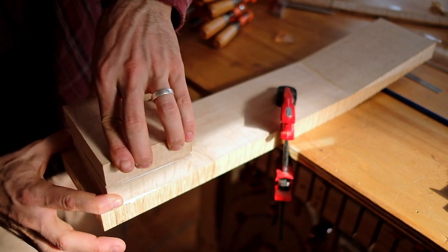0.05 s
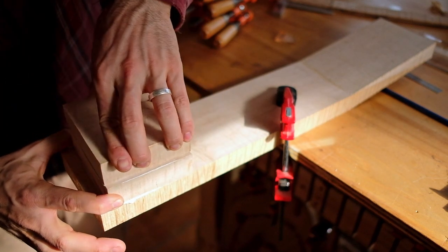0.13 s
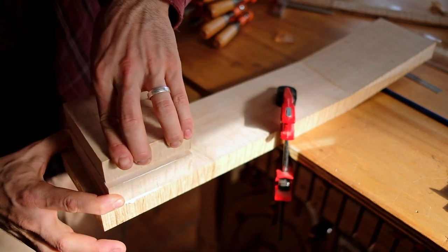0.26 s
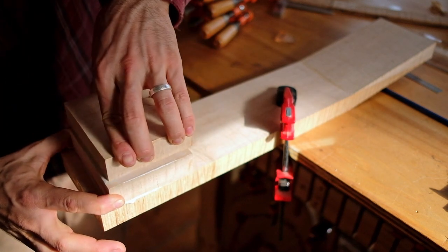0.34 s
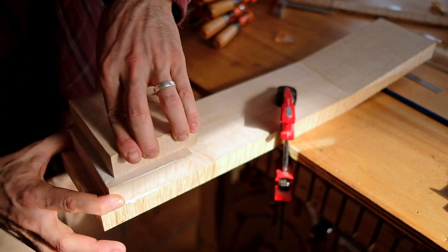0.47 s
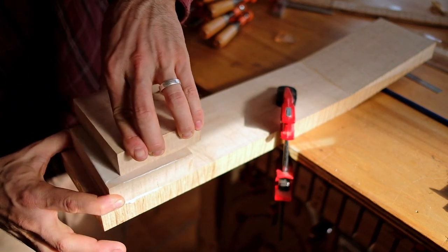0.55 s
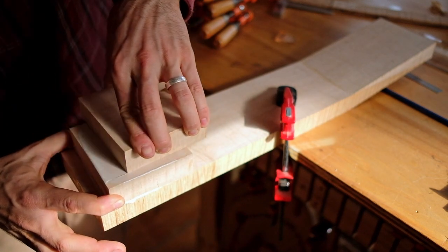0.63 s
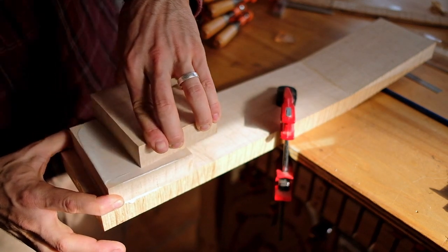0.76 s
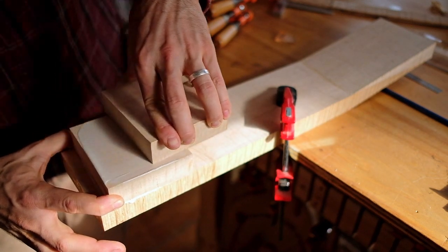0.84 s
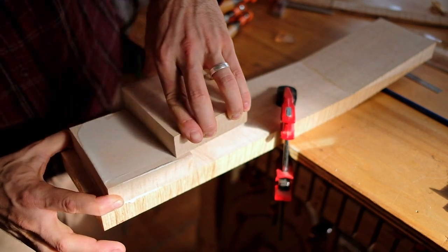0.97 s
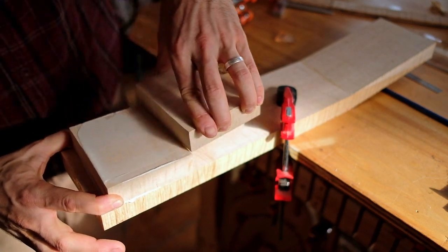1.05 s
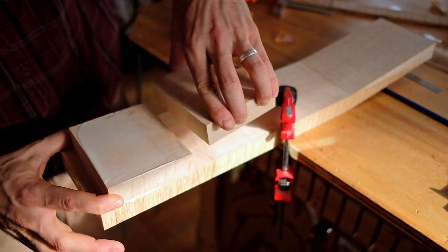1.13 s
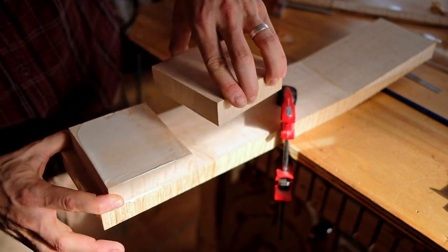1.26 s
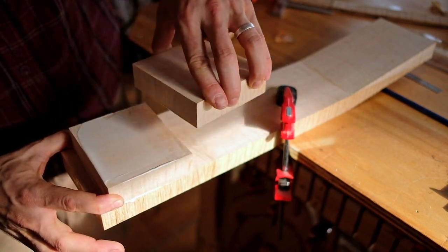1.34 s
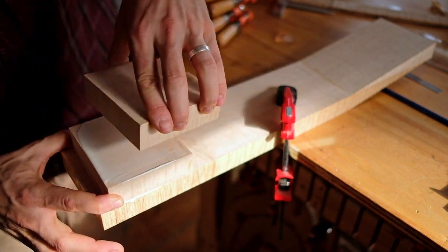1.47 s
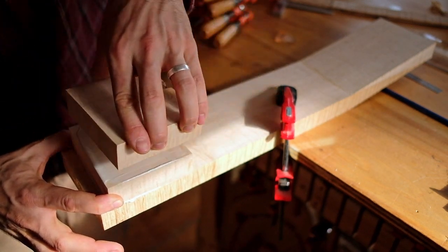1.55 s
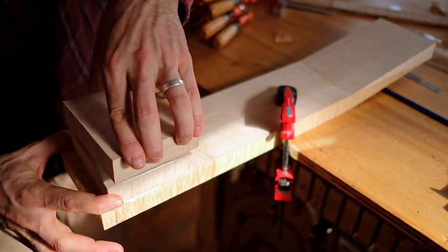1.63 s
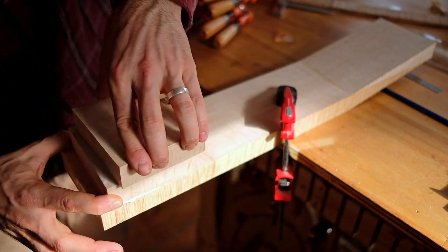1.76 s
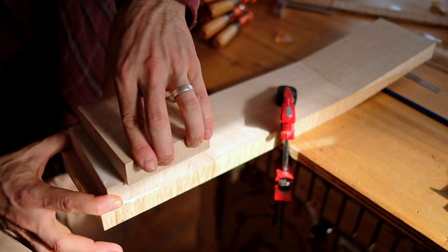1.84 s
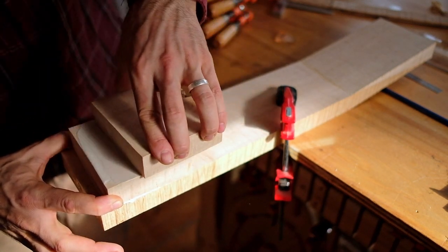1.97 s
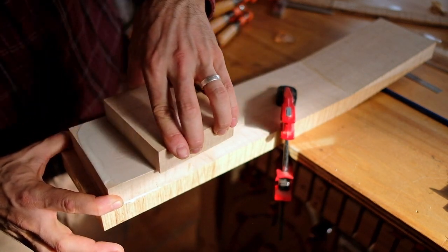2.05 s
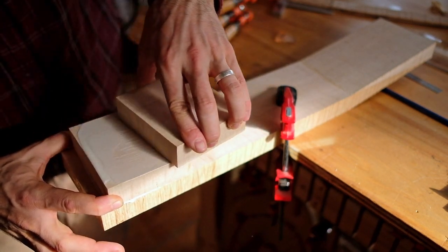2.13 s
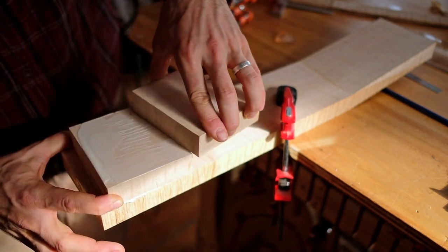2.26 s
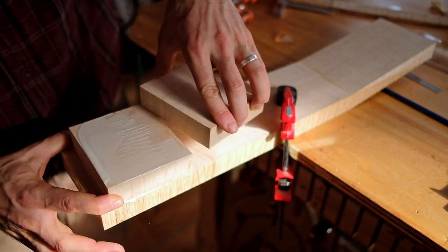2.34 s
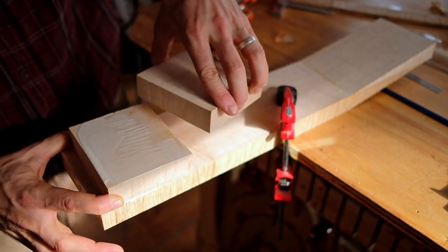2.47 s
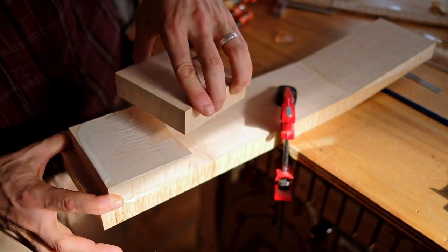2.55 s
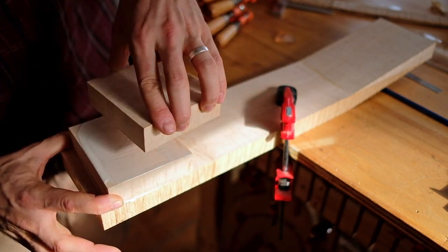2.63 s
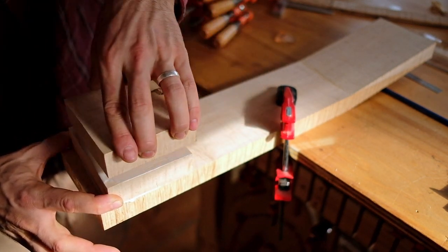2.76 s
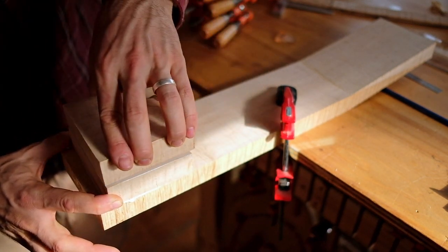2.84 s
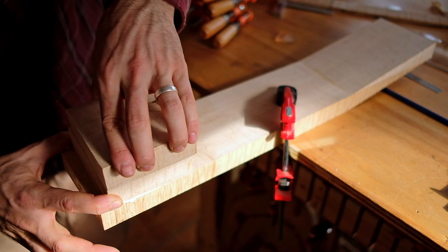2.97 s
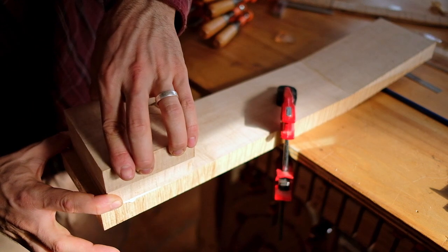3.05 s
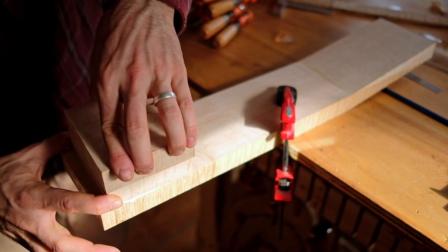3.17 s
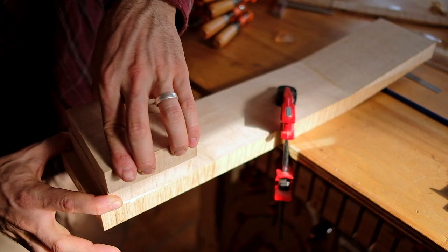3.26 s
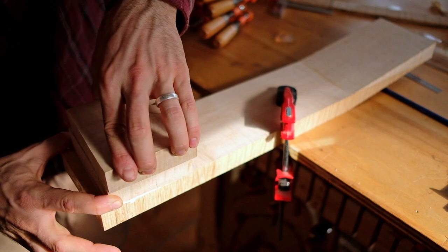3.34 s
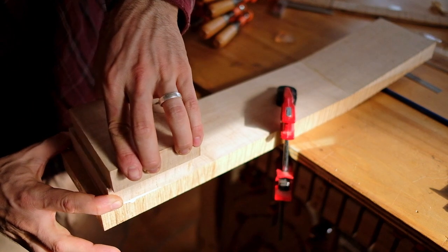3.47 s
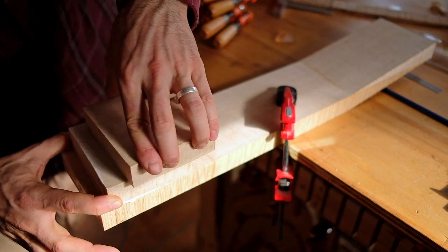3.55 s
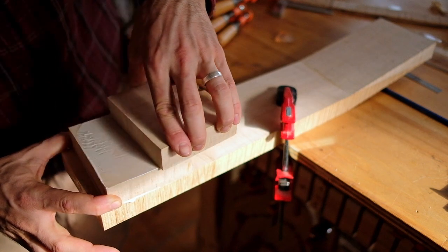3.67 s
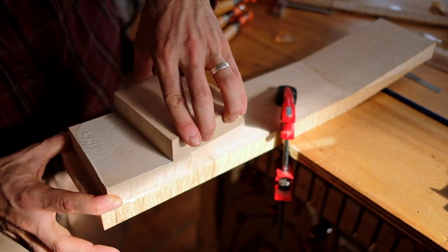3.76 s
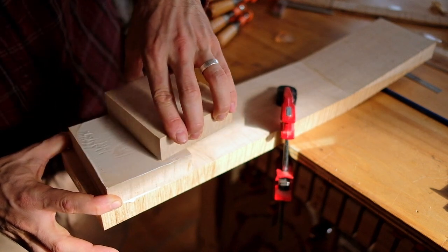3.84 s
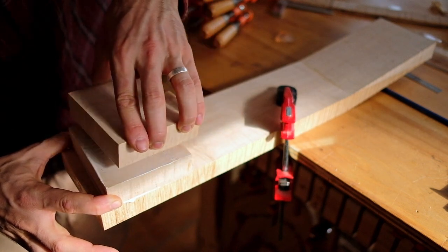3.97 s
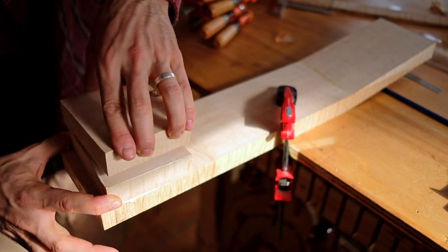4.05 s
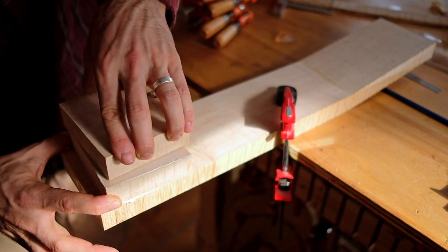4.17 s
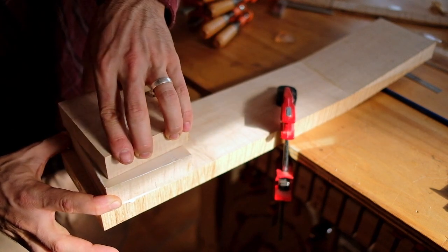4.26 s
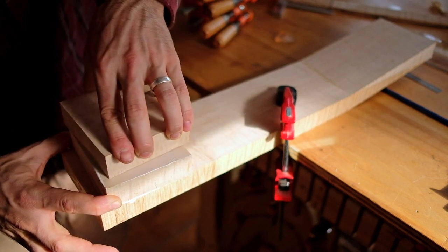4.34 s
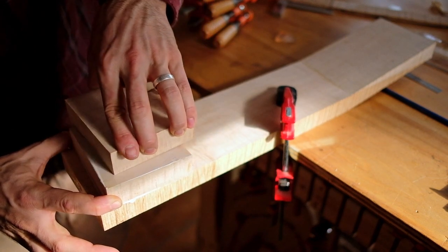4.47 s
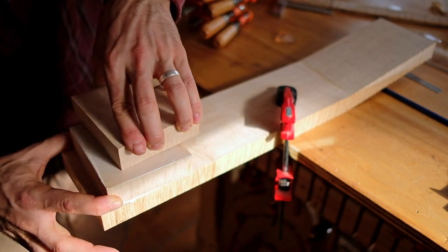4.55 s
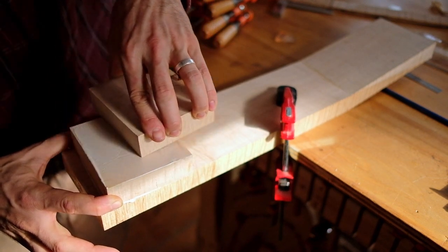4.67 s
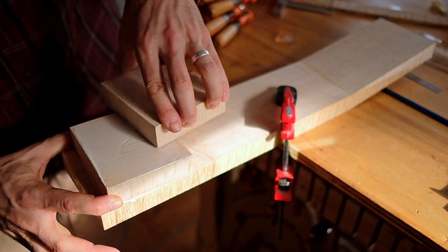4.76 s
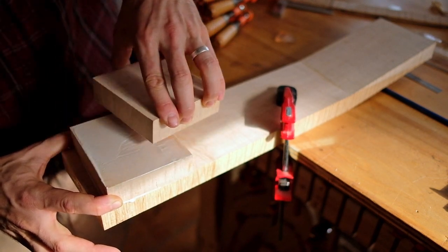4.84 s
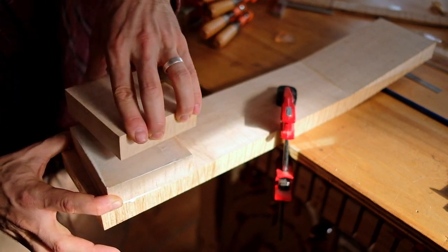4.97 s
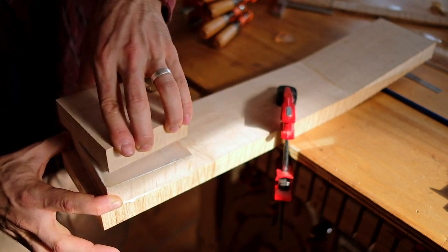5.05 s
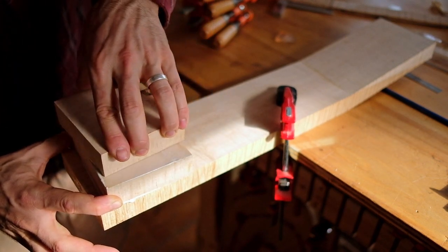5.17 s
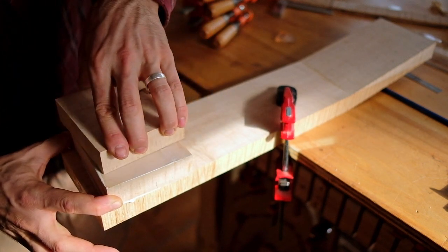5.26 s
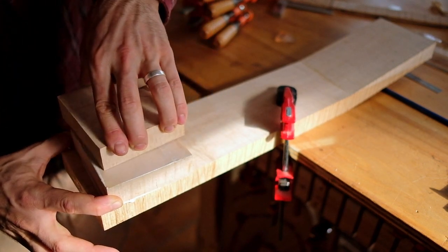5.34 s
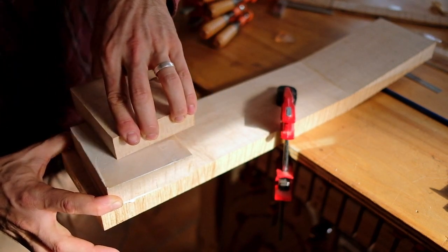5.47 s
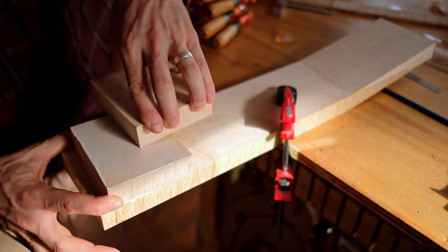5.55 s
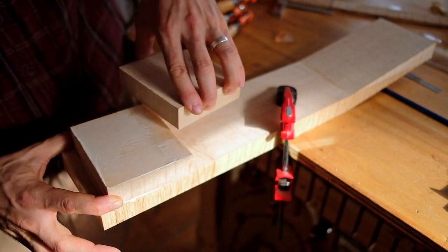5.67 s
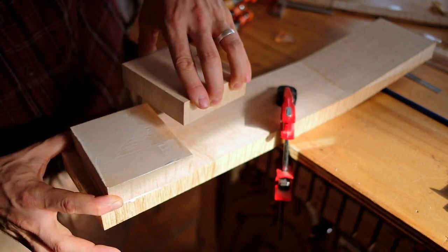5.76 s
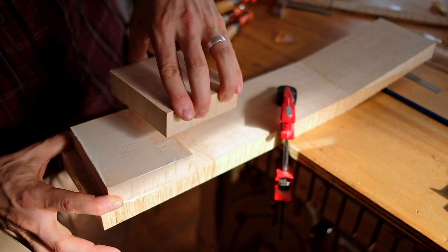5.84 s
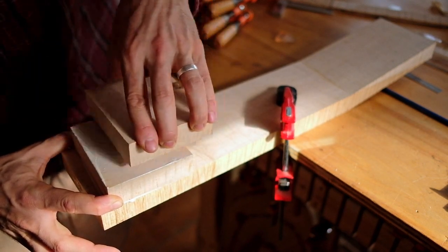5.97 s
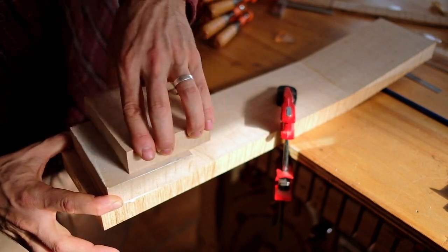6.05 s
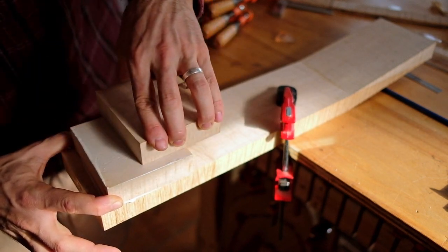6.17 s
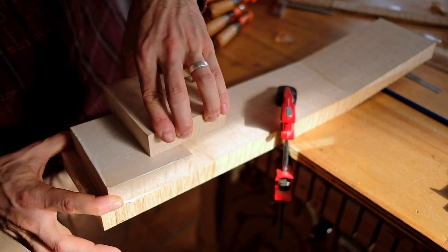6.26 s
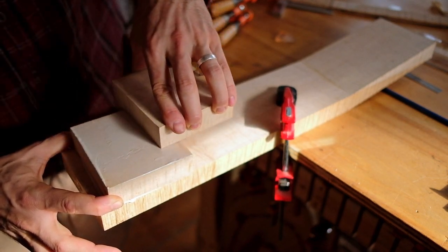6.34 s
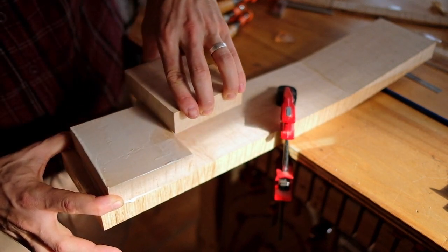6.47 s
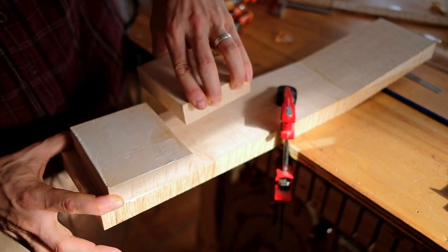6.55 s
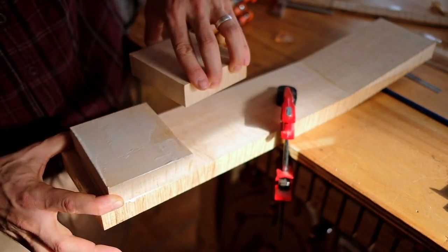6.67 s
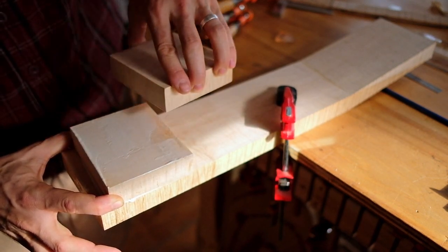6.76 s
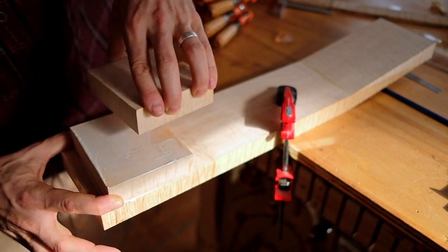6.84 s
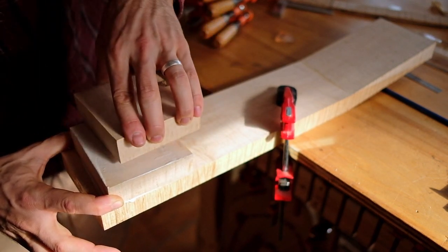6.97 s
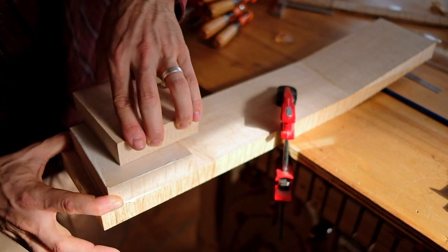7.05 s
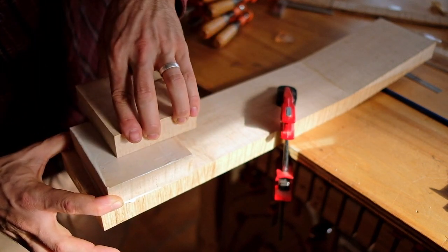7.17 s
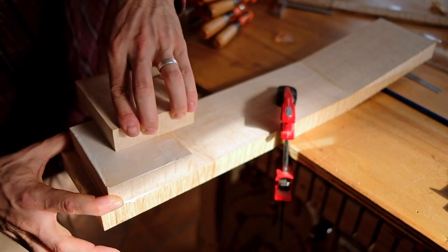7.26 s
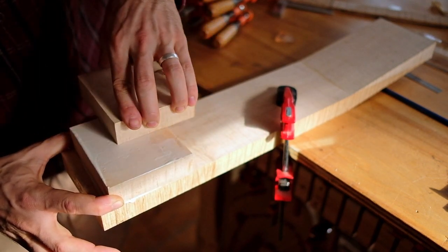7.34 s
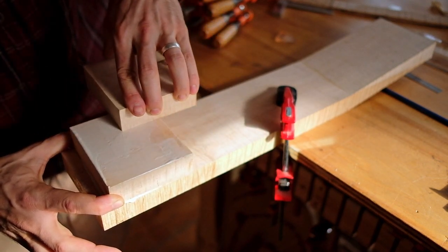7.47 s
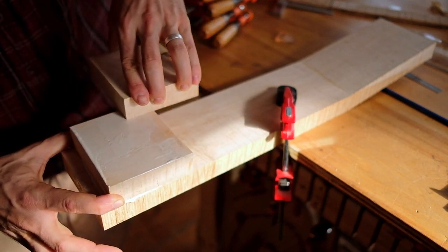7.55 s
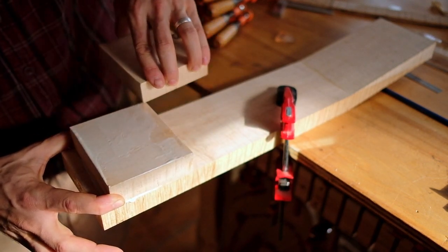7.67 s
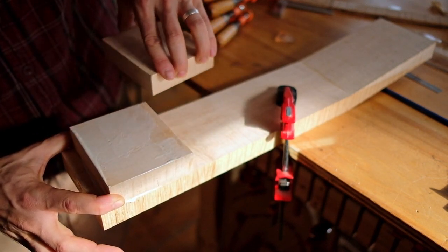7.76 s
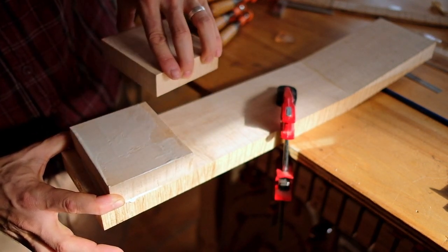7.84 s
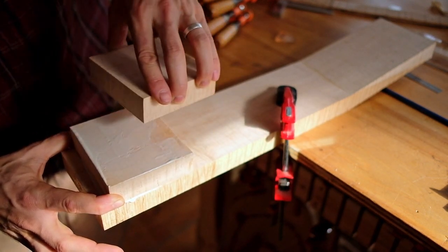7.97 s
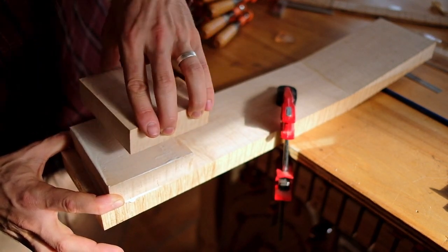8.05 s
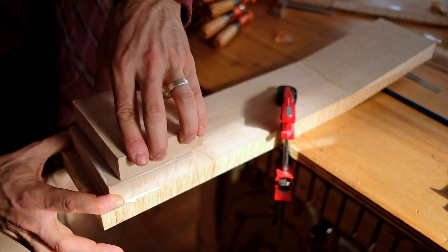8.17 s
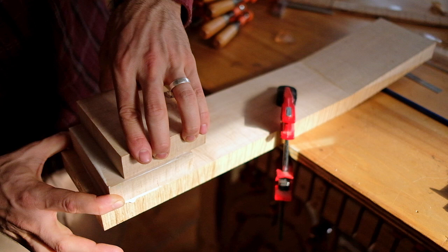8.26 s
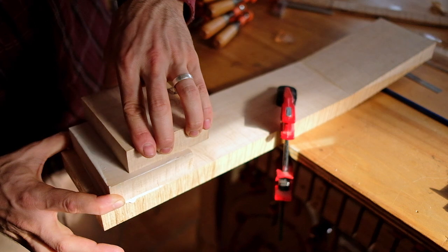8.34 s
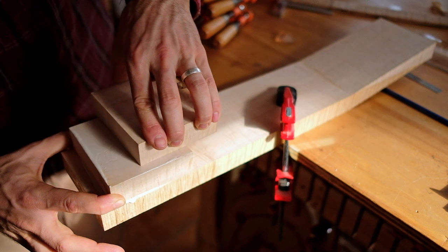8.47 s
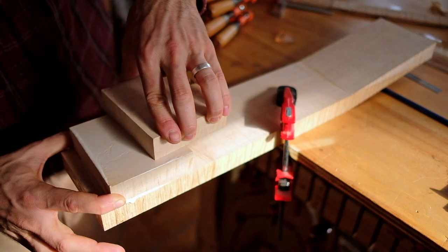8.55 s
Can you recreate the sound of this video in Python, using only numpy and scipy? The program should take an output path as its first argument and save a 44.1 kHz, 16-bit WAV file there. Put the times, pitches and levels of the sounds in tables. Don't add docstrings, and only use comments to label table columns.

```python
import sys
import numpy as np
from scipy import signal
from scipy.fft import rfft, irfft, next_fast_len
from scipy.io import wavfile

SR = 44100
rng = np.random.default_rng(int(sys.argv[2]) if len(sys.argv) > 2 else 0)


def invert_db(x):
    u = np.asarray(x, float) / 20
    return 10 ** u


def generate_wav(signal):
    frames = np.transpose(np.atleast_2d(signal))
    scaled = np.clip(frames, -1, 1) * 32767
    pcm = np.round(scaled).astype(np.int16)
    wavfile.write(sys.argv[1], SR, pcm)


N = 379727

# freq_hz, density_db
HISS_SPECTRUM = [(15, -15.5), (31, -2.5), (62, 0), (220, -0.34), (450, -4), (1600, -16), (10000, -33),
                 (16000, -38)]

# start_s, level_db, centre_hz
GRAIN_TICKS = [(1.0452, -55, 1730), (1.121, -47, 3220), (1.7404, -41, 3407), (2.392, -52.5, 2900),
               (2.992, -64.5, 3760), (4.892, -55, 2600), (5.711, -62.5, 1504), (6.591, -50, 1914),
               (6.599, -57, 2130), (7.017, -44, 2060), (8.051, -59.5, 2500), (8.18, -39, 3250)]
# start_s, level_db, centre_hz
TOUCH_SNAPS = [
    (1.7405, -29, 1480),
    (1.747, -60.5, 6500),
    (5.1228, -44.5, 2970),
    (5.124, -53, 8500),
    (6.057, -21, 2400),
    (6.058, -46.5, 6000),
    (1.7401, -25.5, 950),
    (8.1803, -24.5, 1095),
    (8.1812, -49, 5870),
]
# start_s, level_db, centre_hz
SETTLING_CHATTER = [
    (7.022, -59.5, 5500),
    (8.188, -52, 5000),
]
# start_s, level_db, centre_hz
SHARP_CLICKS = [
    (3.787, -52, 2600),
    (3.892, -59, 2400),
    (6.0575, -55.5, 8000),
    (6.5905, -45, 2990),
                (7.607, -57, 8500),
]

# freq_hz, t60_s
ROOM_DECAY = [(120, 0.26), (320, 0.32), (840, 0.29), (2200, 0.32), (5800, 0.203)]
# freq_hz, likeness_0_to_1
ROOM_LIKENESS = [(100, .6), (300, 0.95), (800, 0.84), (1500, 0.96), (3000, 0.29)]
# freq_hz, level_db
ROOM_TONE = [(150, 4.3), (500, 0.2), (1200, -3.3), (2500, -0.5), (4000, -6.5), (8000, -4.5)]
# freq_hz, difference_db
STEREO_LEAN = [(60, -6), (160, -4.5), (430, -2.5), (1140, -2), (3030, -0.5)]

# start_s, plank_db, bench_minus_plank_db, edge_minus_plank_db (hardness), tilt_0_to_3
LANDINGS = [(1.0703, -50, -5, -16, 1.5), (1.1228, -34.5, -13, -11.5, 2), (1.7394, -13, -11.5, -6, 1.61),
            (2.9925, -18.5, -12.5, -27.5, 0.12), (3.897, -51, -7, -32, 0.12), (4.148, -41.5, 7, -58, 0.057),
            (5.1224, -24.5, -4.5, -24.5, 0.19), (6.057, -14, -12, -8.5, 0.81), (6.5313, -34, -5, -24, 1.5),
            (7.0155, -14.5, -10.5, -21.5, 0.71), (8.1804, -10, -11, -17.5, 2.77),
            (8.447, -62.5, 6.5, 2, 2.1)]
# freq_hz, flat_db, low_tilt_db, high_tilt_db, corner_db, t60_s
BENCH_MODES = [(149.7, -14, -10, -24, -37, 0.25), (200, -31.5, -23.5, -14.5, -33, 0.51),
               (220.5, -3, -6.5, 2.5, -14, 0.2), (242.6, -2, -4.5, -9, -27, 0.2),
               (289.9, -17, 1, -12, -7, 0.099), (312.8, 4, 6.5, -5.5, 3.8, 0.1),
               (361.3, -2.5, 0, 4.6, 0, 0.13), (410.9, -6, -3, -7.5, -5.5, 0.16)]
PLANK_MODES = [(488, 10, 1, -8.5, -5.5, 0.081), (496.4, 4.5, -1.5, -3.5, -10.5, 0.066),
               (547.9, 7, -5.5, -13.5, -20, 0.21), (586, 3.5, -4, -10, -11, 0.32),
               (618.3, -8, -6, -5.5, -7.5, 0.12), (676.4, 2, 3.5, -15, -1.5, 0.051),
               (723, 0.5, 1.5, -11.5, -4.5, 0.23), (754, 5.5, -4, 1.5, -4, 0.12),
               (854.6, 1.5, -3.5, -9.5, -24, 0.07), (846.3, -33, -27.5, -6, -11.5, 0.12)]
BLOCK_MODES = [(970, -8.5, -9, -3, -8.5, 0.11), (1047, -4.5, -6, -13.5, -7, 0.19),
               (1122, 4.5, 6.5, -5.5, 4, 0.048), (1165, -6.5, -0.5, 1, 2, 0.073),
               (1278, -5.5, -3.5, -5.5, -3, 0.18), (1346, -2, 2.5, -3.5, 1.5, 0.042),
               (1447, -18.5, -8.5, -16.5, -14, 0.1)]
EDGE_MODES = [(1589, -15.5, -3.5, 3, 4, .03), (1686, 1.5, 5, -3.5, 0.5, 0.029),
              (1884, 3.5, 9, 0.5, -15.5, 0.026), (2035, 0, -16.5, 2.7, -18, 0.046),
              (2292, -10, -8.5, -7, -10, 0.03), (2600, -6.5, -8.5, -7.5, -16, 0.017),
              (3070, -18, -15.5, -14, -10, 0.016), (3270, -12, -25.5, -21, -18, 0.037),
              (4040, -28, -30, -21.5, -23, .012)]

# start_s, length_s, rub_db, peak_pressure_place_0_to_1, rasp_db
RUBS = [
    (1.071, 0.034, -50, 0.2, -67),
    (1.092, 0.031, -48.5, 1, -57),
    (2.314, 0.075, -43, 0.3, -69.5),
    (2.353, 0.063, -47.5, 0.16, -69),
    (3.743, .08, -66, 0.4, -72),
    (6.495, 0.034, -52, 0.2, -63),
    (6.509, 0.023, -50, 0.8, -67),
    (6.567, .065, -57, .3, -66),
    (6.672, .045, -57, 0, -73.5),
    (8.406, 0.11, -61, 0, -68.5),
]
# freq_hz, level_db, t60_s
GRAIN_MODES = [(1676, -5, 0.022), (2076, 4.5, 0.0086), (2400, -7.5, 0.016)]
FIBRE_MODES = [(3090, 0, 0.021), (3360, 0.5, 0.013)]

# start_s, level_db, freq_hz, t60_s
BENCH_ROCKING = [
    (1.75, -59, 50.84, 0.51),
    (4.151, -65, 60, .3),
    (5.125, -64, 69.6, 0.15),
    (6.061, -57, 75, 0.23),
    (6.519, -62.5, 60, 0.26),
    (7.02, -68, 79.6, 0.37),
    (8.185, -59, 66.2, 0.35),
]


def evened(x):
    return x / np.sqrt(np.mean(x ** 2) + 1e-20)


def read(points, hz):
    freq_hz, value = np.transpose(points)
    return np.interp(np.log(hz + 1), np.log(freq_hz + 1), value)


def add(mix, start_s, sound):
    part = mix[round(start_s * SR):][:len(sound)]
    part += sound[:len(part)]


def hiss():
    size = next_fast_len(N)
    hz = np.fft.rfftfreq(size, 1 / SR)
    spectrum = rfft(rng.standard_normal((2, size))) * invert_db(read(HISS_SPECTRUM, hz))
    noise = evened(irfft(spectrum, size)[:, :N])
    level_db = -61 + np.array([[0.4], [-0.4]])
    return invert_db(level_db) * noise


def cracks(rows, width_share, length_ms):
    out = np.zeros(N)
    t_s = np.arange(SR // 20) / SR
    for start_s, level_db, centre_hz in rows:
        snaps = rng.standard_normal(len(t_s)) * np.exp(-t_s * 1000 / length_ms * 2)
        width_hz = width_share * centre_hz
        envelope = (t_s * width_hz) ** 2 * np.exp(-1.3 * np.pi * width_hz * t_s)
        resonance = envelope * np.sin(2 * np.pi * centre_hz * t_s)
        crack = signal.fftconvolve(snaps, resonance)[:len(t_s)]
        add(out, start_s, invert_db(level_db + 3) * crack / abs(crack).max())
    return out


def room(x):
    start_ms, rise_ms = 2.9, 3.03
    spacing = 20
    taps = np.zeros((2, SR))
    at = np.arange(0, SR - spacing, spacing) + rng.integers(0, spacing, (2, (SR - 1) // spacing))
    np.put_along_axis(taps, at, rng.choice([-1., 1.], at.shape), 1)
    hz, t_s, (shared, apart) = signal.stft(taps, SR, nperseg=256)
    same = np.clip(read(ROOM_LIKENESS, hz), 0, 1)[:, None]
    apart = np.sqrt((1 - same) / (1 + same)) * apart
    decay_db = read(ROOM_TONE, hz)[:, None] - 60 * t_s / read(ROOM_DECAY, hz)[:, None]
    bands = np.array([shared + apart, shared - apart]) * invert_db(decay_db)
    tail = signal.istft(bands, SR, nperseg=256)[1][:, :SR]
    late_ms = np.maximum(np.arange(SR) * 1000 / SR - start_ms, 0)
    tail = tail * (1 - np.exp(-late_ms / rise_ms))
    tail = tail / np.linalg.norm(tail.mean(0))
    return signal.fftconvolve(x[None], tail, axes=1)[:, :N]


def ring(modes, tilt, step_db=0):
    swell_at_500_hz_ms, step_ms = 4.3, 22.1
    table = np.transpose(modes)
    t_s = np.arange(SR // 3) / SR
    hz, t60_s = table[0][:, None], table[-1][:, None]
    mode_db = np.array([np.interp(tilt, range(len(row)), row) for row in table[1:-1].T])[:, None]
    swell_ms = swell_at_500_hz_ms * (500 / hz) ** 0.83
    swell = (1 - np.exp(-t_s * 1000 / swell_ms)) ** 2
    stepping_db = step_db / (1 + np.exp((step_ms - t_s * 1000) / 1.5))
    level = invert_db(mode_db + stepping_db - 60 * t_s / t60_s)
    sound = (level * swell * np.sin(2 * np.pi * hz * t_s)).sum(0)
    return sound / abs(sound).max()


def knocks():
    out = np.zeros(N)
    for start_s, plank_db, bench_db, edge_db, tilt in LANDINGS:
        block_db = 1.9 + 0.44 * edge_db
        wood = ring(PLANK_MODES, tilt, step_db=-19)
        wood = wood + invert_db(block_db) * ring(BLOCK_MODES, tilt, step_db=-19)
        wood = wood + invert_db(bench_db) * ring(BENCH_MODES, tilt)
        wood = wood + invert_db(edge_db) * ring(EDGE_MODES, tilt)
        add(out, start_s, invert_db(plank_db + 0.5) * wood)
    return out


def slides(slips_per_s=1500):
    touch_db, leave_db, fibre_db = -6, -15.5, -8.5
    size = invert_db(5.2 * np.minimum(rng.exponential(1, N), 3)) * rng.choice([-1., 1.], N)
    slips = evened(size * (rng.random(N) < slips_per_s / SR))
    rub, rasp = np.zeros((2, N))
    for start_s, length_s, rub_db, place, rasp_db in RUBS:
        progress = np.arange(0, 1, 1 / (length_s * SR))
        press_db = np.interp(progress, [0, np.clip(place, 0, 1), 1], [touch_db, 0, leave_db])
        add(rub, start_s, invert_db(rub_db + press_db))
        add(rasp, start_s, invert_db(rasp_db + press_db))
    body = ring(PLANK_MODES, 1.62, step_db=-19)
    body = body + invert_db(-10) * ring(BLOCK_MODES, 1.6, step_db=-19)
    body = body + invert_db(-11.5) * ring(BENCH_MODES, 1.3)
    grain, fibre = ring(GRAIN_MODES, 0), ring(FIBRE_MODES, 0)
    out = np.zeros(N)
    for level, wood in [(rub, body), (rasp, grain), (invert_db(fibre_db) * rasp, fibre)]:
        out += signal.fftconvolve(slips * level, wood)[:N] / np.linalg.norm(wood)
    return out


def rocking():
    out = np.zeros(N)
    for start_s, level_db, freq_hz, t60_s in BENCH_ROCKING:
        add(out, start_s, invert_db(level_db) * ring([(freq_hz, 0, t60_s)], 0))
    return out


def scene():
    wood = cracks(GRAIN_TICKS, width_share=0.33, length_ms=2.2)
    wood = wood + cracks(TOUCH_SNAPS, width_share=0.55, length_ms=1.2)
    wood = wood + cracks(SETTLING_CHATTER, width_share=0.73, length_ms=8.6)
    wood = wood + cracks(SHARP_CLICKS, width_share=0.9, length_ms=0.25)
    wood = wood + knocks() + slides() + rocking()
    heard = wood + invert_db(-9.5) * room(wood)
    heard[1] = np.roll(heard[1], 2)
    size = next_fast_len(N)
    lean_db = read(STEREO_LEAN, np.fft.rfftfreq(size, 1 / SR))
    lean = invert_db(np.outer([0.5, -0.5], lean_db))
    return irfft(rfft(heard, size) * lean, size)[:, :N] + hiss()


def band_limit(x):
    return signal.sosfilt(signal.butter(12, 15720, fs=SR, output="sos"), x)


def record(dry):
    return band_limit(dry)


dry = scene()
out = record(dry)
generate_wav(out)
```